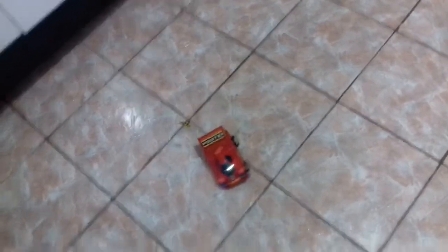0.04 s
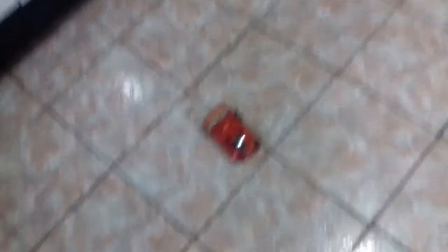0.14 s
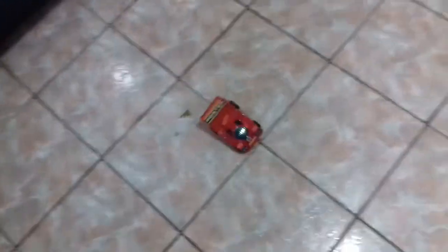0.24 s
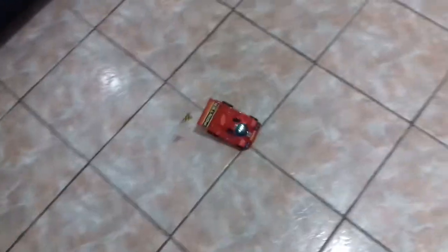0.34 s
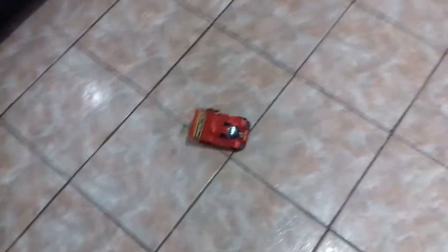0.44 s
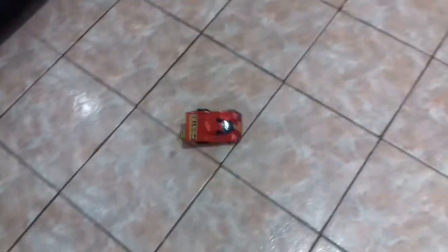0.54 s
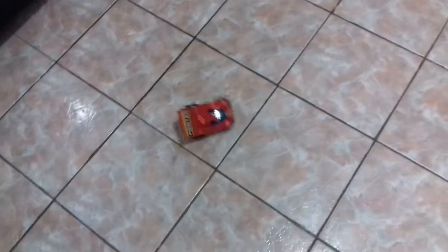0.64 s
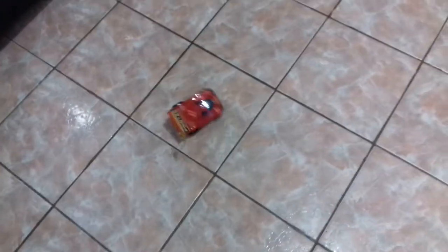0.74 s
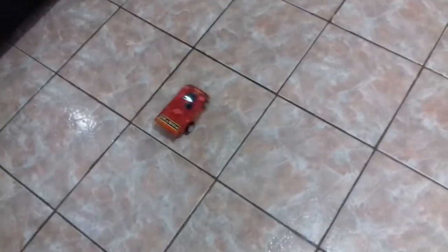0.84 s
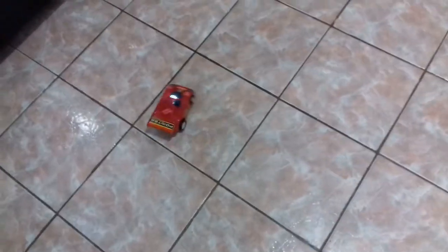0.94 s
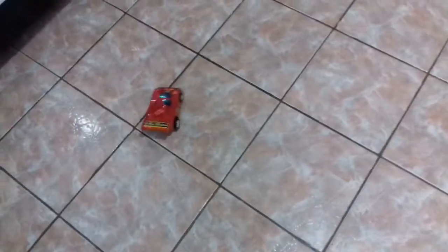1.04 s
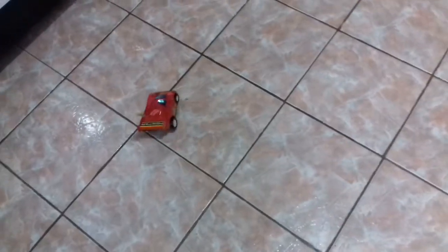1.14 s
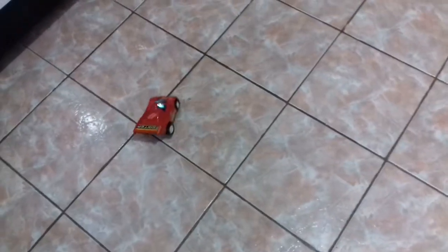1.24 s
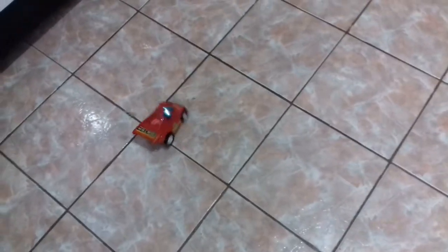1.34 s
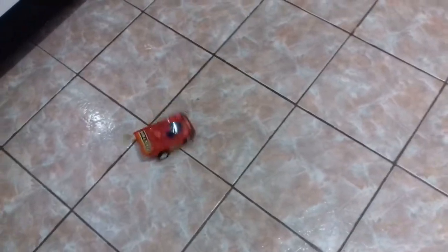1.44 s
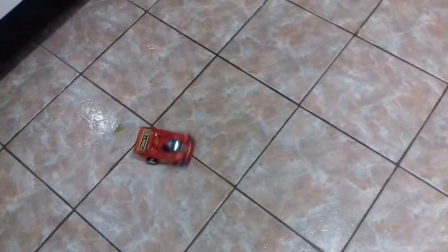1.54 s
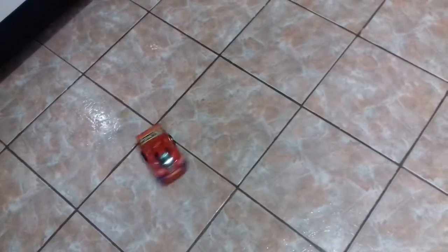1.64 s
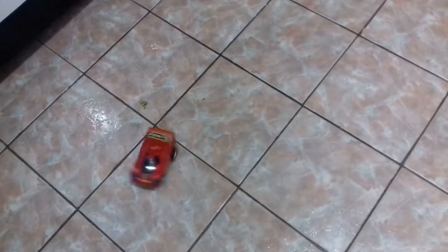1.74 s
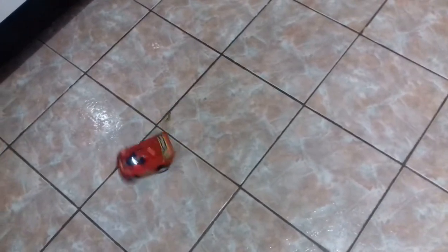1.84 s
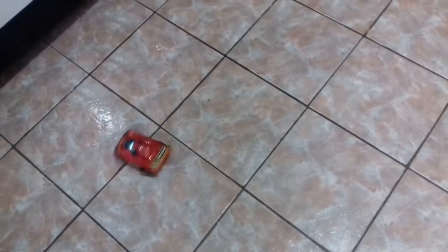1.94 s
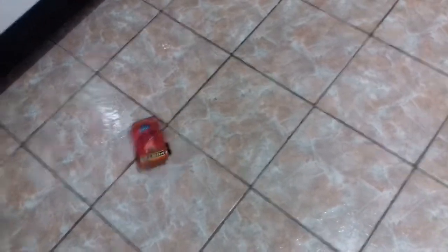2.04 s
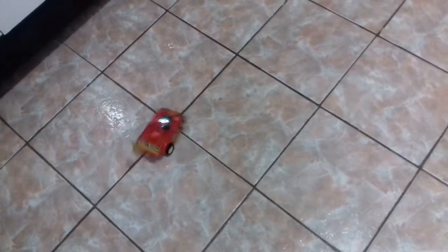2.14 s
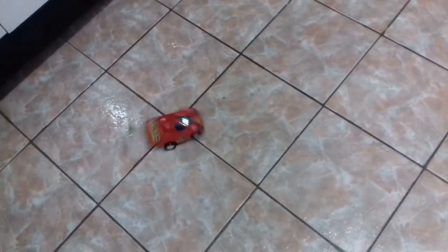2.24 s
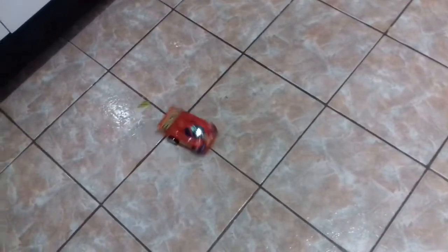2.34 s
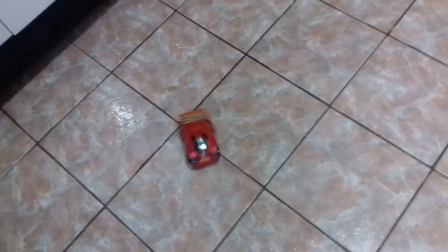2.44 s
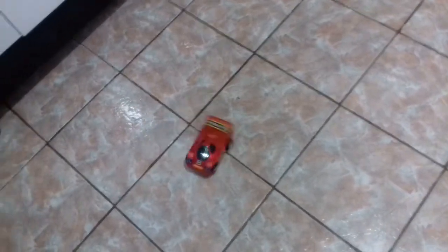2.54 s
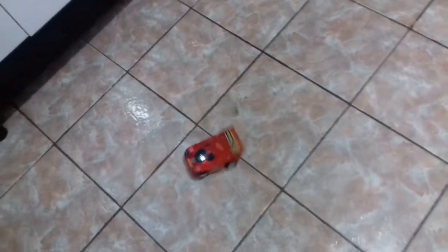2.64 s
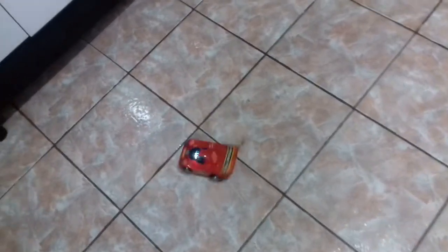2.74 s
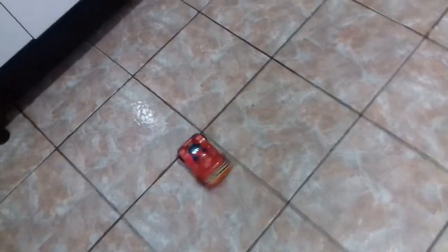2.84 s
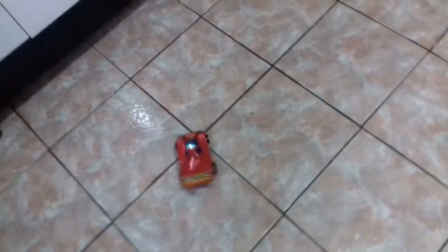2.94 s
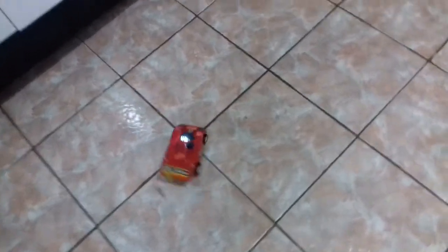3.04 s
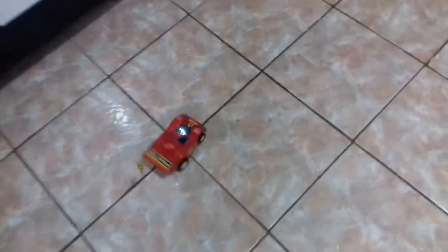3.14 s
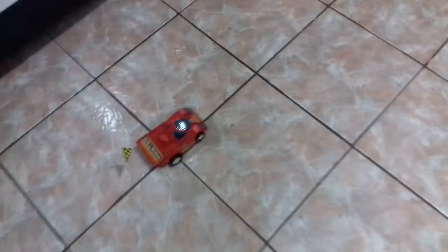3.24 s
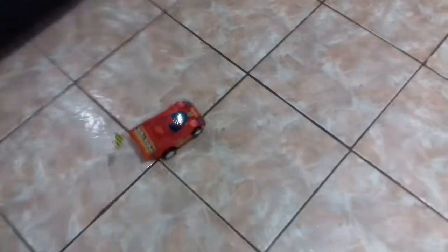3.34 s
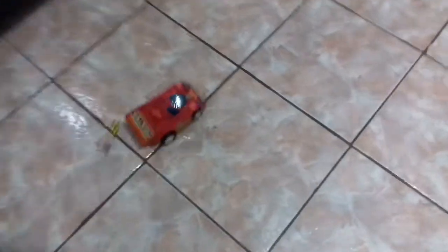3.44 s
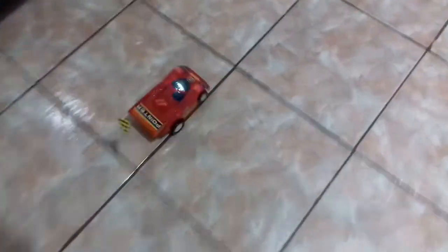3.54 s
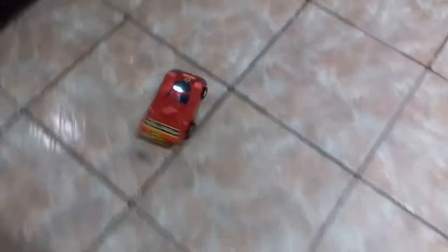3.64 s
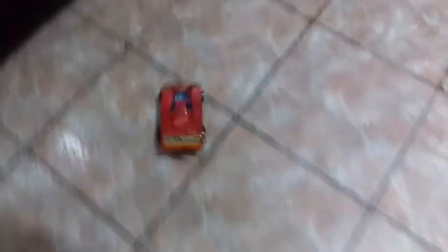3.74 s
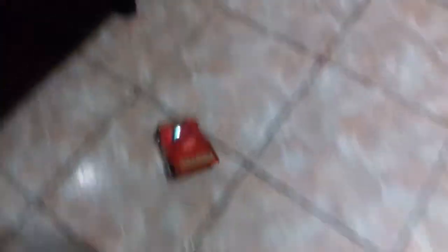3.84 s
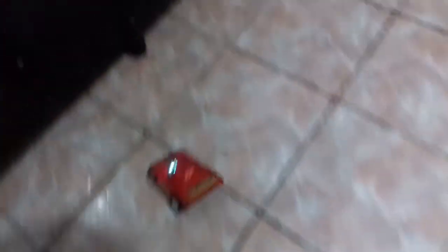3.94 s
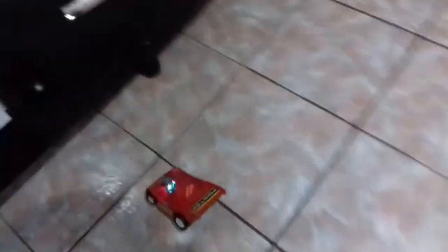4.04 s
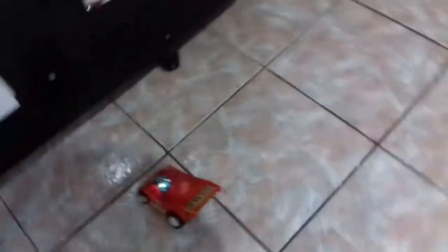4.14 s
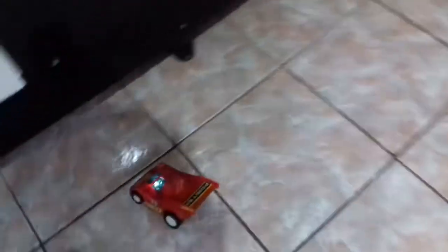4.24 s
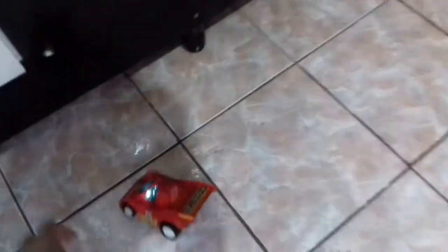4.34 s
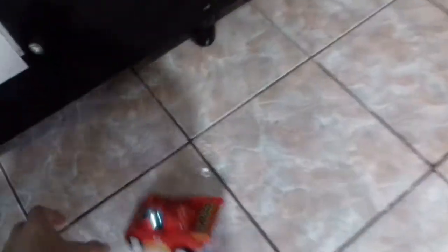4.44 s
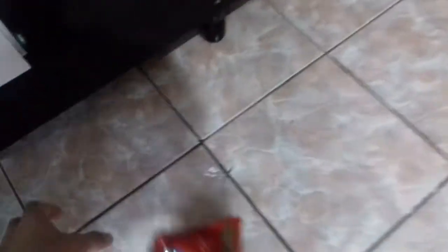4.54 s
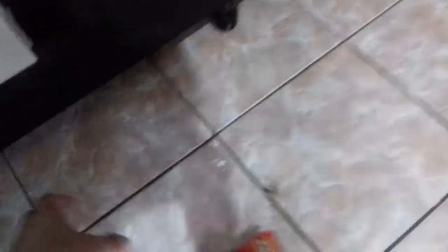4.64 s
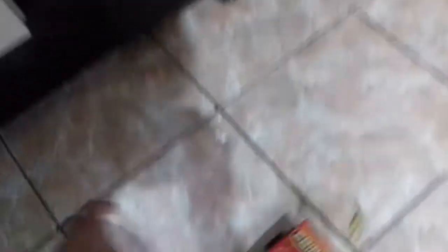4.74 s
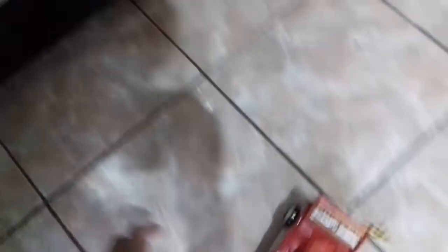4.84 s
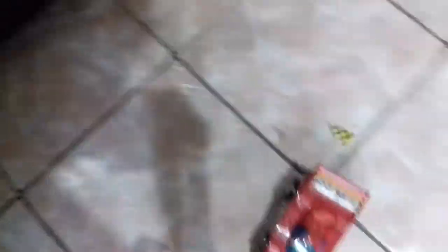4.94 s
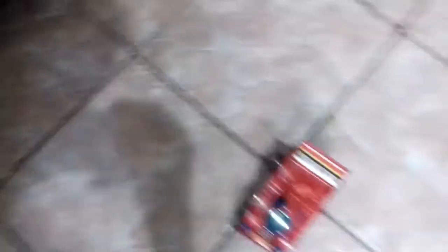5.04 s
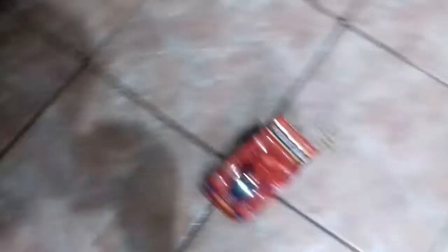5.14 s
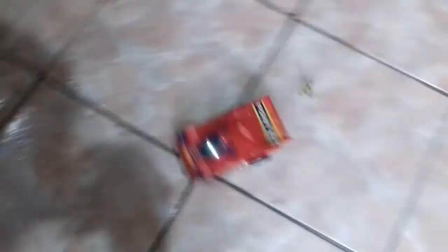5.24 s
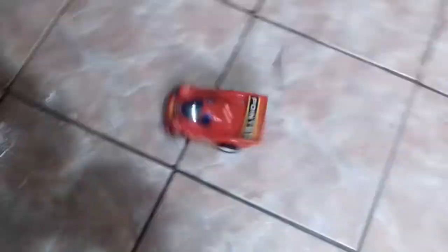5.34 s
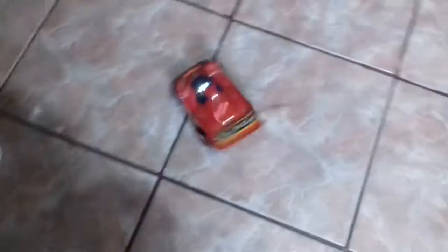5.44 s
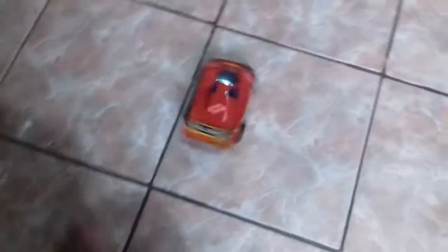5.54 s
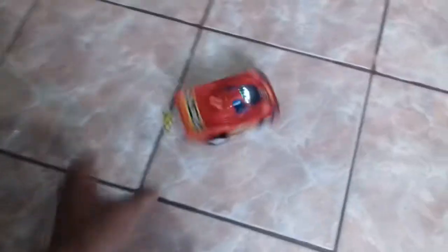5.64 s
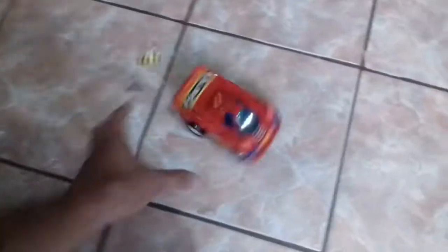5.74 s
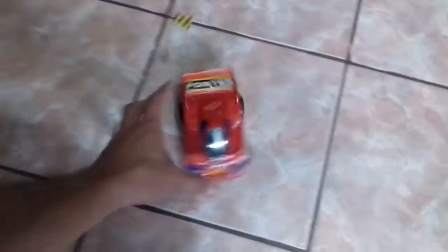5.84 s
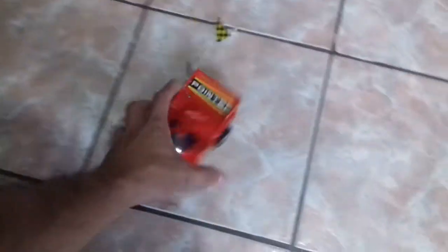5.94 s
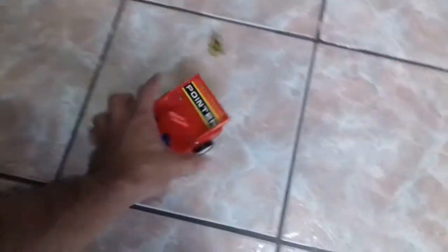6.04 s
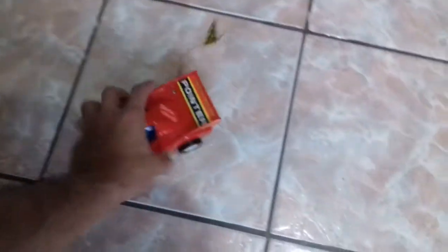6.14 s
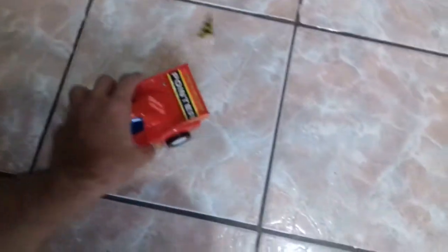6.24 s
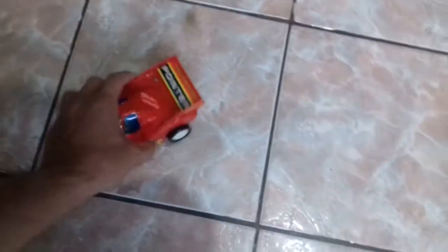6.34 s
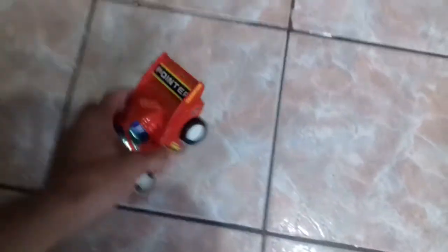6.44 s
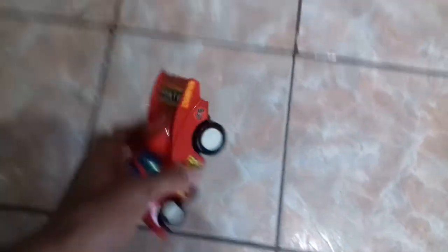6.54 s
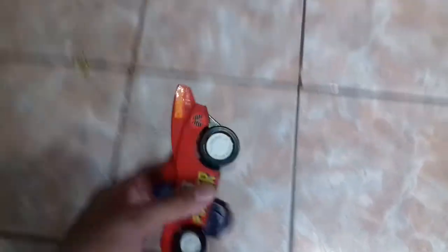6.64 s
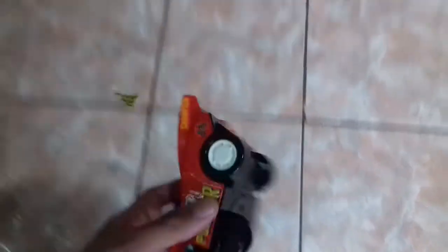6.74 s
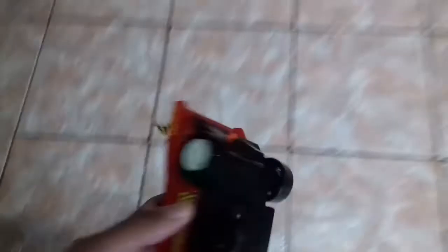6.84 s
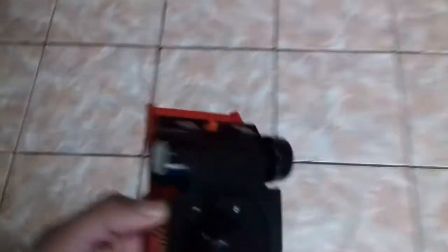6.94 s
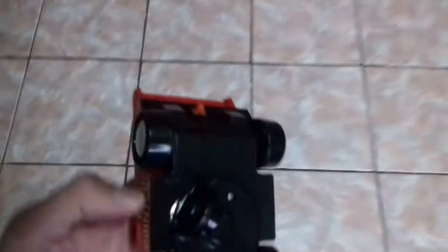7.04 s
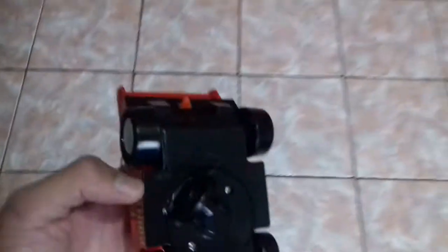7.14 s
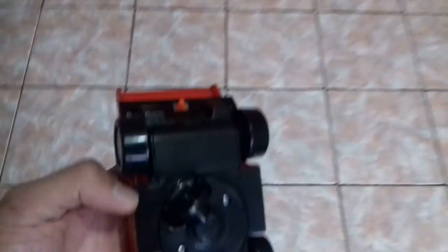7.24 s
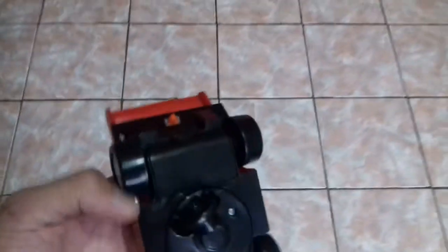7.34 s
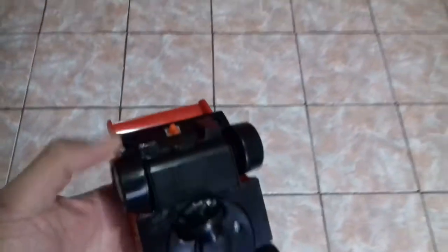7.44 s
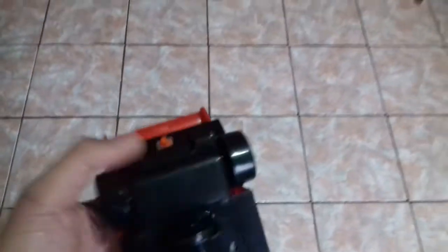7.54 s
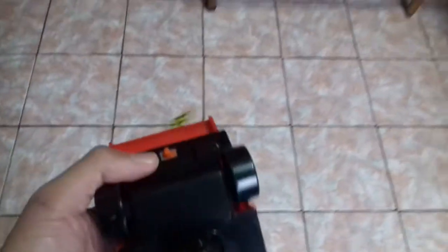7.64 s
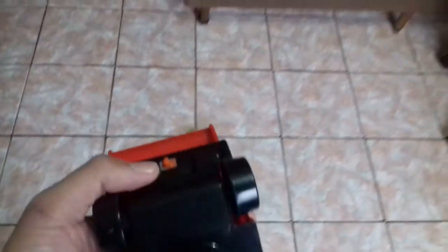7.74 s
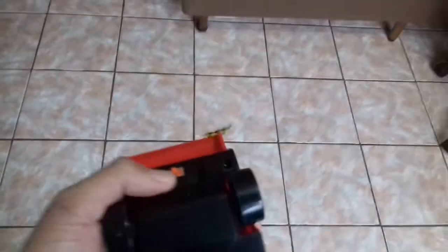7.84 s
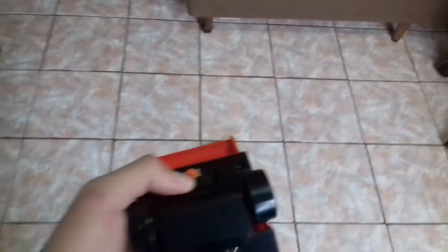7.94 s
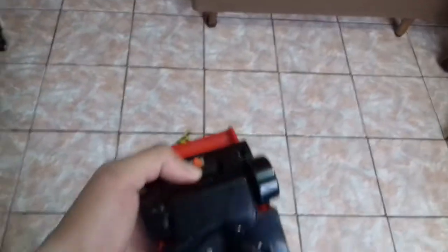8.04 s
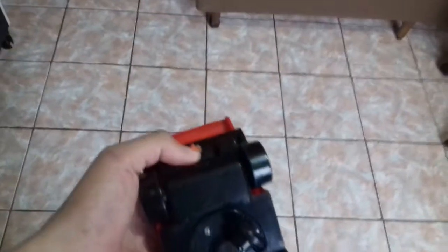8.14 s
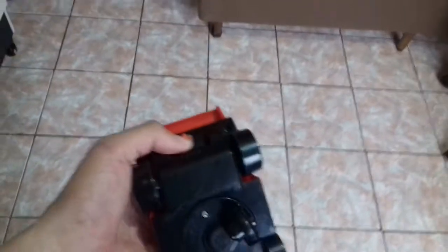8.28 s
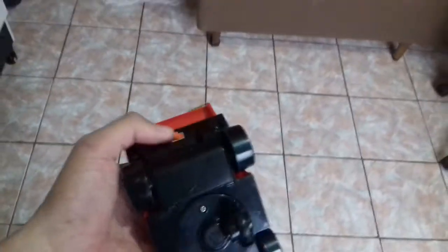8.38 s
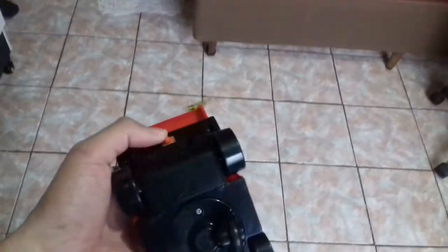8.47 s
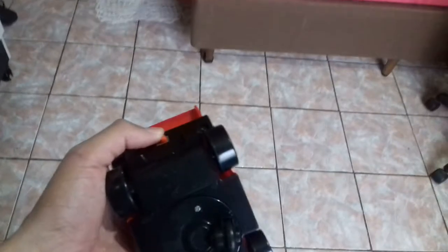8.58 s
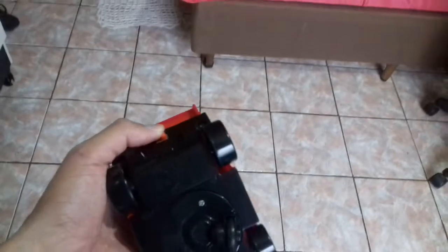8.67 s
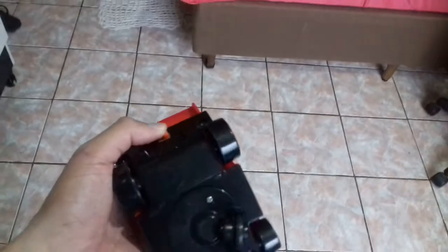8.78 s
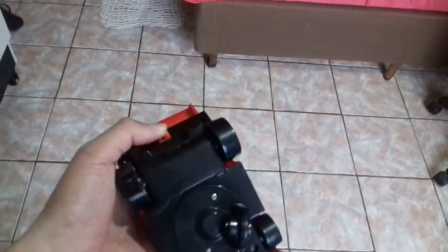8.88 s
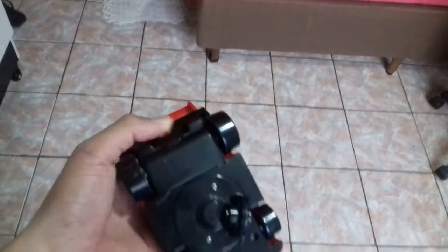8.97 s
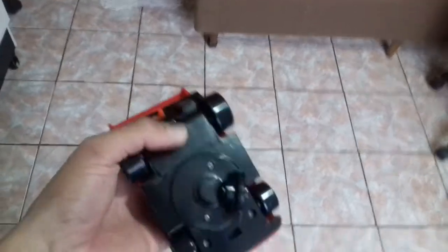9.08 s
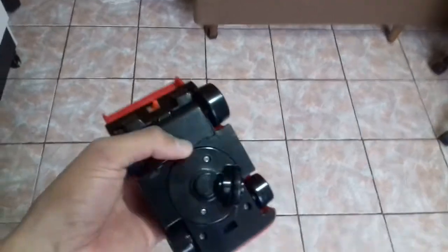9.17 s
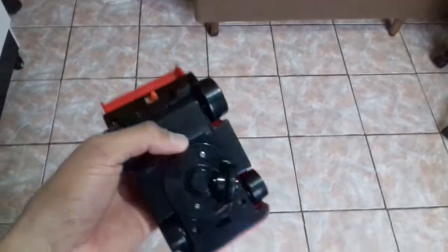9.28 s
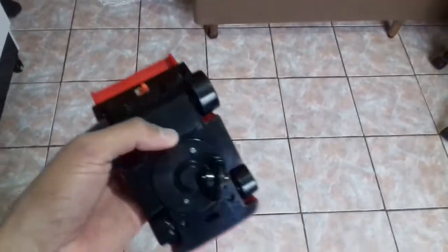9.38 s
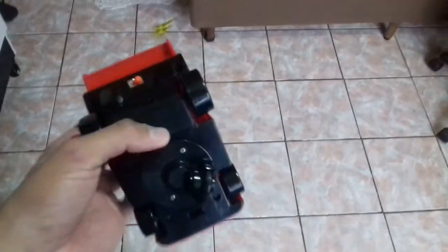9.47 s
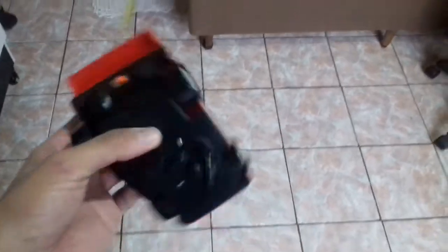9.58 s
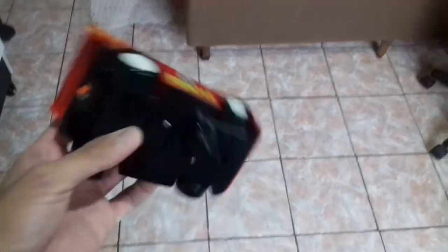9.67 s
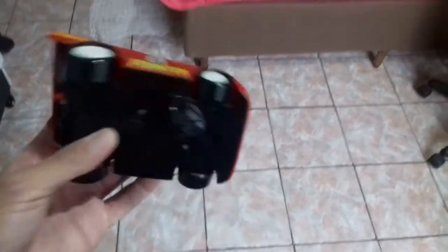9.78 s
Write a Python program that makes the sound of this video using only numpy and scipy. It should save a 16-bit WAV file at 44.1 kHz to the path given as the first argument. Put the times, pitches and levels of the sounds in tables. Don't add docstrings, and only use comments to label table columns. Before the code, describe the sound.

A loud, buzzy toy motor with uneven gear chatter fills a tiled room from the start, its tone shifting as the car spins and knocks over joints. Lifted off the floor, it loses the rattle and sings at steadier pitches. Then it winds down to near silence, with soft handling clicks on hollow plastic at the end. Close handheld microphone, same sound in both channels, short bright echoes.

```python
import sys
import numpy as np
from scipy import signal
from scipy.fft import rfft, irfft
from scipy.io import wavfile
from scipy.ndimage import uniform_filter1d, minimum_filter1d

SR = 44100
rng = np.random.default_rng(int(sys.argv[2]) if len(sys.argv) > 2 else 0)


def file_out(sig):
    cols = np.atleast_2d(sig).T
    lim = np.clip(cols, -1, 1)
    pcm = np.round(lim * 32767).astype(np.int16)
    wavfile.write(sys.argv[1], SR, pcm)


def boost(x):
    u = np.asarray(x, float) / 20
    return 10 ** u


N = 432621
T = np.arange(N) / SR

LIFT_S = (6.33, 6.4)
SWITCH_S, COAST_S = 8.7, 0.55

# [start_s, tick_db, jolt_db]
JOINT_BUMPS = [(0.919, -12, 8), (0.986, -20, 5.5), (1.044, -17, 0), (1.2386, -18, 3.5), (1.4351, -19, -0.5),
               (1.5614, -23.5, 4), (1.6442, -28.5, 3.5), (1.935, -22, 2), (2.006, -16.5, 7),
               (2.0636, -22.5, 4.5), (2.2353, -14, 4.5), (2.5182, -32.5, 4), (2.6329, -15.5, 1.5),
               (2.7703, -28.5, 5), (3.1328, -23, 3.5), (3.212, -18, 5), (3.456, -15.5, -1),
               (3.5483, -22, -1), (3.7269, -16, 1), (3.7743, -21, -1), (4.1011, -20.5, 1.5),
               (4.731, -25, 1.5), (4.794, -10, 4), (4.858, -21, 5.5), (4.887, -25.5, 7), (4.904, -20.5, 7),
               (4.93, -19.5, 4), (4.96, -19.5, 5), (5.001, -20.5, -4), (5.0868, -18.5, 1), (5.139, -24, 3),
               (5.245, -22, 8), (5.2633, -25, 7), (5.328, -19, 0.5), (5.3627, -21.5, 3.5),
               (5.7084, -19, -2), (5.917, -20, 2), (6.7883, -25.5, -2.5), (7.24, -20.5, 5.5),
               (7.978, -21, 1.5), (8.6545, -21, 2), (9.289, -65, 0.5), (9.3035, -60, -0.5),
               (9.7652, -58, 0)]


def evened(x):
    return x / np.sqrt(np.mean(x ** 2) + 1e-20)


def add(mix, s, sound):
    part = mix[round(s * SR):][:len(sound)]
    part += sound[:len(part)]


def wander(hz):
    low_pass = signal.butter(2, hz, fs=SR / 32)
    coarse = signal.lfilter(*low_pass, rng.standard_normal(N // 32 + 2))
    return np.interp(np.arange(N) / 32, np.arange(len(coarse)), evened(coarse))


def colour(x, points):
    pitch_hz, level_db = np.transpose(points)
    hz = np.fft.rfftfreq(len(x), 1 / SR)
    curve_db = np.interp(np.log(hz + 1), np.log(pitch_hz + 1), level_db)
    return evened(irfft(rfft(x) * boost(curve_db), len(x)))


def resonate(x, hz, width):
    turn = np.exp(2j * np.pi * np.cumsum(hz * np.ones(len(x))) / SR)
    r = np.exp(-np.pi * width / SR)
    smooth = signal.lfilter([(1 - r) ** 2], [1, -2 * r, r ** 2], x * turn.conj())
    return 2 * (turn * smooth).real


def air():
    # [pitch_hz, level_db per Hz]
    air_colour = [(15, -45.5), (25, -27.5), (60, -30.5), (86, -27.5), (152, -23), (178, -19.5),
                  (231, -19.5), (306, -18.5), (418, -18.5), (1820, -32), (2180, -23), (2970, -34),
                  (4060, -25.5), (5530, -43), (12000, -45.5), (15700, -47.5), (22000, -120)]
    # [pitch_hz, level_db]
    appliance_hums = [
        (45.5, -77.5),
        (303, -69),
    ]
    hums = np.zeros(N)
    for hz, db in appliance_hums:
        level = boost(db + 1.5 * wander(4)) * np.sqrt(2)
        hums += level * np.sin(2 * np.pi * np.cumsum(hz + 5.1 * wander(2.8)) / SR)
    rumble = colour(rng.standard_normal(N), [(20, -23.5), (45, -12.0), (80, -26.0), (130, -3.5),
                                             (260, 9.5), (500, -17.5), (900, -61.0)])
    stilling_db = np.interp(T, (8, 9.1), [0, -9])
    rumble *= boost(-77 + 5.5 * wander(1.5) + stilling_db + 2.5 * wander(18))
    hiss = boost(-59.5 + 1.2 * wander(5)) * colour(rng.standard_normal(N), air_colour)
    return hiss + rumble + hums


def room(x):
    at, span = np.arange(100, 14000, 22), 32768
    fade = boost(-60 * at / SR / .3)
    out = np.zeros(N + span)
    padded = np.pad(x, (span // 2, span))
    for start in range(0, N + span // 2, span // 2):
        taps = np.zeros(14022)
        spots = at + rng.integers(0, 22, len(at))
        taps[spots] = rng.choice([-1., 1.], len(at)) * fade
        piece = padded[start:start + span] * np.sin(np.pi * np.arange(span) / span)
        add(out, start / SR, signal.oaconvolve(piece, taps / np.linalg.norm(taps)))
    return signal.lfilter(*signal.butter(1, 7000, fs=SR), out[span // 2:][:N])


def nearby(x):
    echoes = np.zeros(N)
    for delay_s, share in ((.0003, .2), (.0011, .1)):
        drifting_s = delay_s * (1 + .15 * np.tanh(wander(.4)))
        echoes += share * np.interp(T - drifting_s, T, x)
    return (x + echoes) / 0.98


def fingers():
    # [start_s, level_db]
    rub_path = [
        (9.612, -48),
        (9.668, -49),
        (9.705, -53),
        (9.745, -48),
        (9.762, -58),
        (9.784, -57),
        (9.81, -52),
    ]
    # [pitch_hz, level_db per Hz]
    rub_tone = [(350, -49), (600, -31), (849, -23.5), (1110, 5), (1610, -11.5), (1850, 2), (2200, -12),
                (3000, -8), (4270, -5), (8000, -45.5), (10400, -67), (17600, -120)]
    s, db = np.transpose(rub_path)
    sizes = boost(2.6 * np.minimum(rng.exponential(1, N), 3))
    slips = sizes * (rng.random(N) < 4000 / SR) * rng.standard_normal(N)
    return boost(np.interp(T, s, db, left=-120)) * colour(slips, rub_tone)


def ticks():
    out, u = np.zeros(N), np.arange(3000) / SR
    bright = signal.butter(2, (6500, 15500), "band", fs=SR)
    for s, tick_db, _ in JOINT_BUMPS:
        tick = signal.lfilter(*bright, rng.standard_normal(3000) * np.exp(-u / .005))
        add(out, s, boost(tick_db - 8.5) * tick)
    return out


def thuds():
    # [start_s, peak_db, pitch_hz]
    dull_knocks = [(0.695, -51, 202), (0.911, -39, 350), (1.526, -40.5, 460), (2.75, -45, 240),
                   (3.817, -45, 350), (3.929, -47, 413), (4.795, -42, 368), (4.839, -24, 860),
                   (4.858, -18, 856), (4.904, -20.5, 860), (4.923, -47.5, 450), (4.936, -18.5, 835),
                   (4.957, -23.5, 860), (5.006, -18.5, 854), (5.046, -31.5, 880), (5.076, -17.5, 870),
                   (5.218, -51, 462), (6.189, -48, 482), (8.66, -50, 300), (9.1, -45, 201),
                   (9.108, -48, 170), (9.146, -47, 160), (9.157, -48, 219), (9.3, -54.5, 301)]
    # [start_s, peak_db, pitch_hz]
    rattles = [(0.318, -29, 875), (0.437, -23, 869), (0.979, -19, 867), (1.053, -21, 821),
               (1.282, -23, 832), (1.561, -21, 883), (1.601, -25, 899), (1.827, -21, 875),
               (2.063, -23, 872), (2.282, -22, 877), (2.482, -20, 867), (2.672, -21, 864),
               (2.84, -24, 807), (3.137, -26, 859), (3.356, -23, 810), (3.534, -28, 794),
               (3.928, -23, 886), (4.339, -29, 861)]
    # [start_s, peak_db, pitch_hz]
    late_rattles = [(5.264, -20, 773), (5.329, -23, 899), (5.368, -20, 832), (5.451, -22, 875),
                    (5.905, -24, 848), (6.165, -23, 840), (6.358, -26, 851)]
    out, u = np.zeros(N), np.arange(3000) / SR
    for s, db, hz in dull_knocks + rattles + late_rattles:
        deep = hz < 490
        decay_s, width = 0.0045, 420
        if s < LIFT_S[1]:
            decay_s, width = (.022 if deep else 0.011), 200
        blow = rng.standard_normal(3000) * np.minimum(u / 0.0012, 1) * np.exp(-u / decay_s)
        band = signal.butter(2, ((.55 if deep else .8) * hz, 1000), "band", fs=SR)
        push = signal.lfilter(*band, resonate(blow, hz, width))
        add(out, s, boost(db - 2) * push / abs(push).max())
    return out


def clicks():
    # [start_s, peak_db, lower_hz, upper_hz, upper_db]
    shell_clicks = [(0.9182, -3, 2000, 3490, -3), (4.7948, -1, 1834, 2450, -5), (5.328, -2, 2070, 3900, -4),
                    (6.2934, -2.5, 2600, 3700, -8), (9.2884, -52, 1176, 4180, 3),
                    (9.303, -42, 1350, 4000, 3), (9.3444, -52.5, 2220, 4220, 2.5),
                    (9.567, -49, 1230, 3900, 6), (9.615, -31, 2520, 4200, -5), (9.6315, -38, 1850, 4000, 4),
                    (9.635, -29, 1120, 2900, 1), (9.646, -36, 2550, 3300, -4), (9.6533, -29, 1700, 4300, 8),
                    (9.712, -28, 2450, 3900, -5), (9.7135, -33, 1600, 1900, 0),
                    (9.7652, -19, 2440, 4130, 5), (9.7705, -30, 2400, 3660, 10),
                    (9.783, -35, 1870, 4150, 8), (9.79, -37, 3780, 4800, 0), (9.8, -38, 1900, 4300, 8)]
    out, u = np.zeros(N), np.arange(3000) / SR
    band = signal.butter(4, (800, 5600), "band", fs=SR, output="sos")
    for s, db, low_hz, high_hz, high_db in shell_clicks:
        decay_s = .003 if s < SWITCH_S else .0014
        fade = np.exp(-u / decay_s) + 0.05 * np.exp(-u / .012)
        crack = rng.standard_normal(3000) * np.minimum(u / 0.00059, 1) * fade
        low = evened(resonate(crack, low_hz, 520))
        high = evened(resonate(crack, high_hz, 700))
        under = evened(resonate(crack, 1200, 500))
        click = signal.sosfilt(band, low + boost(high_db) * high + 0.2 * under)
        add(out, s, boost(db) * click / abs(click).max())
    return out


def coasting():
    return np.clip(1 - (T - SWITCH_S) / COAST_S, .03, 1)


def shaft_turns():
    # [start_s, speed_hz]
    free_speed = [
        (6.4, 244),
        (6.8, 250.5),
        (7.02, 253.2),
        (7.13, 253),
        (7.24, 249.5),
        (7.75, 246.2),
        (8.05, 247.6),
        (8.33, 245),
        (8.58, 245),
    ]
    free_hz = np.interp(T, *np.transpose(free_speed)) * coasting()
    loaded_hz = 221.3 * (1 + .04 * wander(3.3))
    lifted = np.interp(T, LIFT_S, [0, 1])
    return np.cumsum(lifted * free_hz + (1 - lifted) * loaded_hz) / SR


def motor(turns):
    # [start_s, grip 0-1]
    shell_grip = [
        (6.75, 0),
        (6.83, 0.77),
        (7.11, 0.82),
        (7.15, 0),
    ]
    # [multiple, level_db, gripped_level_db]
    shaft_orders = [(1, -74, -58), (2, -58.5, -53), (3, -52.5, -32.5), (4, -68.5, -29.5), (5, -42, -35.5),
                    (6, -52, -64), (8, -37.5, -34), (9, -38, -34), (12, -62.5, -47), (16, -33.5, -42)]
    free = slice(round(LIFT_S[1] * SR), round(9 * SR))
    weight, lines = np.interp(T[free], *np.transpose(shell_grip)), np.zeros(N)
    for k, db, gripped_db in shaft_orders:
        flicker_db = (1.4 + 0.11 * k) * wander(15)[free]
        level_db = db + weight * (gripped_db - db) + flicker_db
        angle = 2 * np.pi * k * (turns + .006 * wander(15))[free]
        lines[free] += boost(level_db) * np.sqrt(2) * np.sin(angle)
    return lines * np.interp(T, [6.55, 6.68, 8.6, 8.72], [0, 1, 1, 0])


def teeth(turns):
    # [start_s, peak_db]
    tile_slaps = [(0.4135, -1), (0.6285, -1.5), (0.9188, -3), (1.0241, -2.5), (1.266, -1), (1.3663, -4.5),
                  (1.4855, -4), (1.56, -1), (2.2348, -3), (3.1328, -4.5), (3.478, -2), (4.0986, -3),
                  (4.2602, -2), (4.7306, -0.5), (4.7952, -0.5), (4.8589, -2.5), (4.888, -4), (4.9072, -2.5),
                  (5.2071, -5.5), (5.226, -5.5), (5.2455, -1.5), (5.2674, -4.5), (5.442, -3.5), (5.461, -4),
                  (6.2931, -2)]
    # [start_s, peak_db]
    free_slaps = [
        (7.1028, -2.5),
        (7.1413, -3),
        (7.2784, -7),
        (7.4456, -5.5),
        (7.4585, -8),
        (7.5039, -6),
        (7.898, -5),
    ]
    strikes = boost(2.5 * np.minimum(rng.exponential(1, N), 4)) * (rng.random(N) < 13000 / SR)
    small_slaps = boost(1.5 * np.minimum(rng.exponential(1, N), 2.5)) * (rng.random(N) < 90 / SR)
    backlash = signal.lfilter([1], [1, -np.exp(-1 / (.009 * SR))], small_slaps)
    db = .4 * evened(backlash - backlash.mean())
    db = db + np.interp(T, LIFT_S, [.6, 1.6]) * np.cos(2 * np.pi * turns)
    u = np.arange(2600) / SR
    slacken = np.linspace(0, 1, num=round(0.016 * SR)) ** 0.83
    for s, _, jolt_db in JOINT_BUMPS:
        add(db, max(s - .02, 0), -0.69 * abs(jolt_db) * slacken)
        add(db, s, abs(jolt_db) * np.exp(-u / 0.0049))
    slap_shape = np.exp(-u / 0.0037) - .25 * np.exp(-u / .03)
    for table in (tile_slaps, free_slaps):
        typical_db = np.median(table, axis=0)[1]
        for s, peak_db in table:
            add(db, s, max(2 + peak_db - typical_db, 0) * slap_shape)
    return strikes, np.clip(db, -20, 9)


def ring(force, modes):
    out = np.zeros(len(force))
    for hz, width, db in modes:
        b, a = signal.iirpeak(hz, hz / (1.45 * width), SR)
        turning = np.interp(np.arange(len(force)) / SR, np.arange(40) / 4, boost(rng.standard_normal(40)))
        once = signal.lfilter(b, a, force * rng.standard_normal(len(force)))
        out += boost(db) * turning * signal.lfilter(b, a, once)
    return evened(out)


def body(force, down, up):
    first, last = (round(s * SR) for s in LIFT_S)
    lifted, out = np.interp(T, LIFT_S, [0, np.pi / 2]), np.zeros(N)
    add(out, 0, np.cos(lifted[:last]) * ring(force[:last], down))
    add(out, first / SR, np.sin(lifted[first:]) * ring(force[first:], up))
    return out


def loudness(near_db, side):
    # [tiles_db, hand_db, facing_db, jolt_db, lost_db]
    part_levels = [
        (-25.5, -32.5, -3, 1.18, 8.5),
        (-19.5, -24, 1, .5, 9),
        (-18.5, -19.5, 1.5, 0.28, 12),
        (-37, -42, 4.5, 1.36, 19.5),
    ]
    lifted, slowdown = np.interp(T, LIFT_S, [0, 1]), 1 / coasting() - 1
    levels = []
    for down, up, weight, jolt, lost in part_levels:
        contact_db = down + (up - down) * lifted
        levels.append(near_db + contact_db + weight * side + jolt * wander(6.1) - lost * slowdown)
    return levels


def panels(drive):
    # [start_s, length_s, from_hz, to_hz, level_db]
    circling = [(0, 0.31, 1880, 1855, -29), (0, 0.32, 3220, 3240, -24.5), (0, 0.34, 3580, 3610, -27.5),
                (0.02, 0.33, 1323, 1255, -26), (0.04, 0.34, 2920, 2920, -24.5),
                (0.21, 0.53, 1870, 1870, -28), (0.24, 0.67, 3246, 3070, -24), (0.42, 0.2, 2350, 2330, -30),
                (0.354, 0.42, 3530, 3490, -22.5), (0.377, 0.18, 1114, 1174, -29),
                (0.39, 0.31, 1583, 1556, -23), (0.61, 0.38, 1123, 1356, -29),
                (0.76, 0.21, 3560, 3480, -26.5), (0.894, 0.24, 866, 848, -33), (1.07, 0.2, 3730, 3800, -28),
                (1.2, 0.58, 1963, 1833, -28.5), (1.245, 0.71, 3550, 3476, -26.5),
                (1.37, 0.2, 4990, 4920, -26), (1.65, 0.54, 1750, 1858, -28), (1.75, 0.13, 850, 830, -38.5),
                (1.96, 0.23, 4300, 4222, -28), (2.067, 0.24, 3374, 3570, -23.5),
                (2.08, 0.84, 1717, 1945, -30.5), (2.3, 0.38, 1230, 1235, -29.5),
                (2.37, 0.53, 880, 860, -32), (2.377, 0.2, 3720, 3730, -32), (2.7, 0.17, 3920, 3910, -25),
                (2.81, 0.21, 1986, 1930, -30), (2.82, 0.41, 1740, 1750, -29),
                (2.84, 0.29, 3520, 3440, -29.5), (3.08, 0.12, 3659, 3670, -28.5),
                (3.164, 0.3, 1210, 1150, -35)]
    # [start_s, length_s, from_hz, to_hz,
    # level_db]
    swerving = [(3.2, 0.43, 1944, 1908, -30.5), (3.35, 0.43, 1260, 1330, -31),
                (3.44, 0.22, 3570, 3670, -39), (3.71, 0.34, 1840, 1970, -26), (3.76, 0.39, 1340, 1250, -32),
                (3.82, 0.19, 3370, 3230, -31.5), (3.94, 0.27, 3815, 3715, -34.5),
                (4.04, 0.44, 1894, 1967, -20.5), (4.06, 0.28, 1293, 1280, -26.5),
                (4.06, 0.44, 3230, 3124, -27), (4.29, 0.46, 1290, 1260, -27.5),
                (4.432, 0.39, 3075, 3020, -22.5), (4.46, 0.25, 1900, 1880, -27),
                (4.631, 0.53, 1707, 1970, -28), (4.75, 0.38, 892, 850, -30.5), (5.1, 0.51, 850, 875, -36),
                (5.17, 0.22, 1310, 1290, -38), (5.18, 0.36, 1664, 1680, -25.5),
                (5.23, 0.2, 1850, 1844, -30.5), (5.4, 0.32, 3830, 3716, -33.5),
                (5.41, 0.34, 1217, 1153, -27.5), (5.53, 0.42, 1773, 1817, -26.5),
                (5.77, 0.7, 1330, 1173, -30.5), (6.05, 0.33, 2560, 2544, -25.5),
                (6.2, 0.21, 3240, 3170, -26.5), (4.6, .19, 3070, 3100, -23), (5.8, .25, 2100, 2200, -28),
                (.4, .32, 3160, 3110, -25), (2.4, .3, 1760, 1750, -27)]
    # [start_s, length_s, from_hz, to_hz, level_db]
    in_hand = [(6.44, 0.083, 1900, 1900, -30), (6.58, 0.54, 3440, 3450, -31), (6.61, 0.22, 3900, 4000, -44),
               (6.84, .46, 2330, 2190, -29), (6.85, 0.35, 4200, 4070, -29), (6.99, 0.3, 3770, 3720, -26.5),
               (7.05, 0.45, 2644, 2410, -28.5), (7.16, 0.25, 4300, 4240, -29), (7.2, 0.23, 4920, 4950, -31),
               (7.29, .5, 3930, 4000, -25.5), (7.65, 0.24, 5200, 5180, -35), (7.7, 0.36, 1980, 2000, -31),
               (7.7, .76, 1220, 1200, -38), (7.77, 0.35, 4070, 4150, -27), (7.9, 0.25, 5900, 6000, -39),
               (7.99, 0.34, 2225, 2250, -25.5), (8.04, 0.57, 3798, 3930, -28.5),
               (8.4, 0.43, 5440, 5250, -33), (8.59, 0.23, 4420, 4360, -35), (8.62, 0.24, 3970, 3950, -41),
               (6.69, 0.087, 1990, 2020, -29), (8.62, .2, 1900, 1880, -30.5), (8.8, .22, 1900, 1960, -38),
               (8.7, 0.32, 1495, 1500, -41.5), (7.55, 0.56, 11300, 12000, -49),
               (8.2, .65, 12500, 12550, -50.5), (8.3, 0.5, 14300, 14100, -53.5),
               (8.4, 0.5, 8700, 8800, -51)]
    # [start_s, length_s, from_hz, to_hz, level_db]
    roof_ring = [(0, 0.73, 6460, 6350, -37), (.6, 0.47, 4940, 4900, -28.5), (2.3, 1.14, 5800, 5370, -30.5),
                 (3.2, 0.89, 5300, 5030, -26.5), (3.5, 1.14, 6800, 6350, -34),
                 (3.2, 0.83, 4250, 4300, -25.5), (4.3, .75, 4800, 4770, -27), (4.85, 0.59, 3500, 4000, -27),
                 (5.7, 0.52, 4100, 4300, -24.5), (6.0, 0.31, 5010, 4800, -26.5),
                 (9.06, .09, 2000, 2000, -55), (9.12, .09, 2000, 2000, -62), (9.06, .09, 3700, 3700, -56),
                 (9.12, .09, 3900, 3900, -63)]
    out = np.zeros(N)
    for table, base_hz in ((circling + swerving, 35), (in_hand, 150), (roof_ring, 650)):
        for s, length, from_hz, to_hz, db in table:
            part = drive[round(s * SR):round((s + length) * SR)]
            glide, width = np.linspace(from_hz, to_hz, len(part)), base_hz + .013 * from_hz
            mode = evened(resonate(part, glide, width))
            power = uniform_filter1d(mode ** 2, size=300) + .05
            mode = evened(mode / power ** (.6 / 2))
            add(out, s, boost(db) * mode * signal.windows.tukey(len(part), .35))
    return out * boost(2.0 * wander(34))


def car(turns):
    # [pitch_hz, width_hz, level_db]
    chassis_modes = [
        [(845, 360, -5.5), (844, 92, 1.5), (1142, 124, 2.5), (1293, 200, 8)],
        [(870, 173, -8), (1178, 155, -4), (1230, 330, -6), (1397, 79, -8)],
    ]
    shell_modes = [
        [(1612, 310, -0.5), (1900, 340, 3.5), (2383, 410, 0.5), (2760, 310, 0)],
        [(1900, 790, -6.5), (1980, 300, -8), (2380, 380, 1), (2644, 180, 1)],
    ]
    case_modes = [
        [(3000, 340, 2.5), (3700, 1040, 4), (4300, 1320, 2.5), (6560, 190, -10.5)],
        [(2960, 150, 3.5), (3900, 1020, 7.5), (5140, 710, -1), (6040, 220, -0.5)],
    ]
    # [pitch_hz, level_db per Hz]
    fizz_colour = [(3820, -48), (6500, -6), (7490, -7.5), (8940, -7), (10700, -3.5), (12800, -4),
                   (14500, -9.5), (15900, -16)]
    # [start_s, near_db, side 0-1]
    floor_path = [(0.0, 1, 0.7), (0.55, 0, 0.94), (0.9, 1, 1), (1.0, 0.5, 0.35), (1.45, 1, 0.7),
                  (1.7, 0.5, 0.2), (2.4, 0.5, 0.24), (3.0, 0, 0.28), (3.6, 1, 0.3), (4.0, 1, 0.6),
                  (4.72, 1, 0.8), (4.85, 0.5, 0.5), (5.3, 1, 0.05), (5.98, 0.5, 0.2), (6.08, 2.5, 0.2),
                  (6.32, 0.5, 0.56)]
    # [start_s, near_db, side 0-1]
    hand_path = [
        (6.4, -0.5, 0),
        (6.62, -2, 0.5),
        (6.8, 0, 0.05),
        (7.25, -1, 1),
        (8.0, -0.5, 0.6),
        (8.4, -1.5, 0.9),
        (8.66, -1, 1),
    ]
    s, *columns = np.transpose(floor_path + hand_path)
    near_db, side = (np.interp(T, s, c) for c in columns)
    chassis_db, shell_db, case_db, fizz_db = loudness(near_db, side)
    case_hz = np.where(T < LIFT_S[1], 3750 - 483 * side, 4000 * (0.794 + .2 * coasting()))
    case_hz = uniform_filter1d(case_hz, size=6000)
    strikes, bunch_db = teeth(turns)
    force = strikes * boost(bunch_db)
    chassis = body(force, *chassis_modes)
    shell = body(force, *shell_modes)
    case = body(force, *case_modes)
    drive = force * rng.standard_normal(N)
    case = evened(case + 0.5 * evened(resonate(drive, case_hz, 620)))
    scrape = (strikes + .5) * rng.standard_normal(N)
    fizz = colour(scrape * boost(1.15 * bunch_db + 1.2 * wander(60)), fizz_colour)
    out = boost(chassis_db) * chassis + boost(shell_db) * shell + boost(case_db) * case + boost(fizz_db) * fizz
    out = out + panels(drive)
    depth = np.interp(T, [*LIFT_S, 7, 8.6], [.5, .72, .7, .35])
    out -= depth * resonate(out, np.interp(T, LIFT_S, [1490, 1570]), 330)
    out -= np.interp(T, LIFT_S, [.55, .25]) * signal.lfilter(*signal.iirpeak(2700, 9, SR), out)
    return signal.sosfilt(signal.butter(3, 700, "high", fs=SR, output="sos"), out)


def scene():
    turns, wet = shaft_turns(), .28
    toy = nearby(car(turns)) + ticks() + thuds() + clicks() + fingers()
    mono = np.sqrt(1 - wet) * toy + np.sqrt(wet) * room(toy) + motor(turns) + air()
    return np.array([mono, mono])


def roll_off(x):
    return signal.sosfilt(signal.butter(12, 15735, fs=SR, output="sos"), x)


def record(dry):
    dry = signal.sosfilt(signal.butter(2, 38, "high", fs=SR, output="sos"), dry)
    room_left = np.minimum(.95 / (abs(dry).max(0) + 1e-9), 1)
    gain = minimum_filter1d(room_left, size=240)
    gain = uniform_filter1d(uniform_filter1d(gain, size=120), size=120)
    return roll_off(dry * gain)


dry = scene()
out = record(dry)
file_out(out)
```